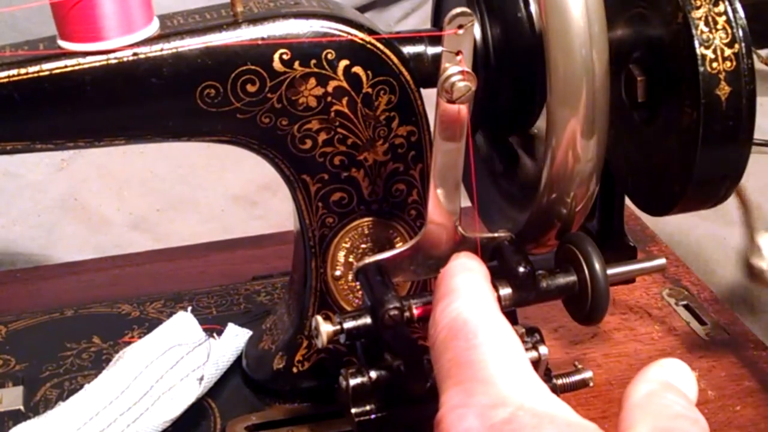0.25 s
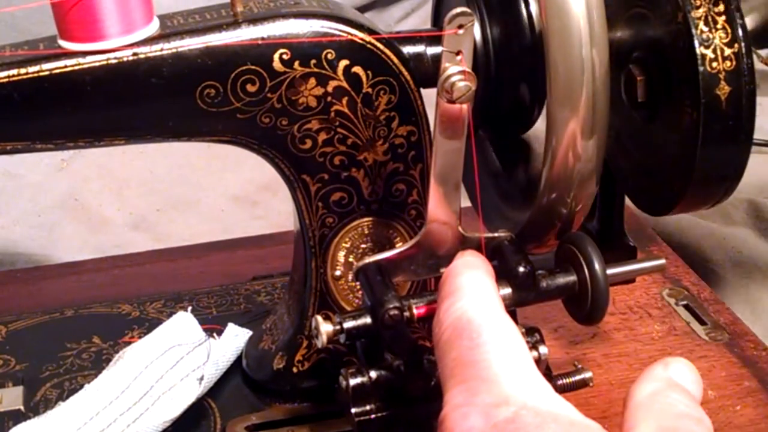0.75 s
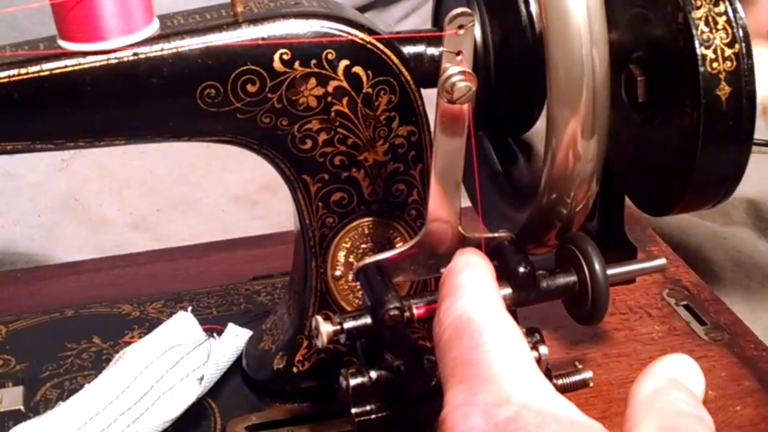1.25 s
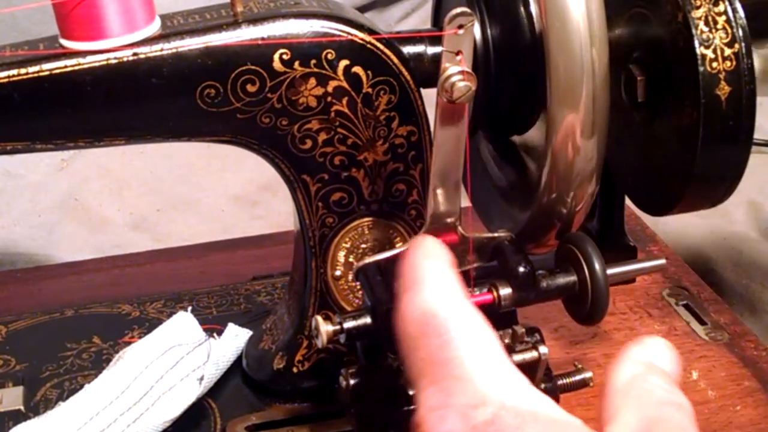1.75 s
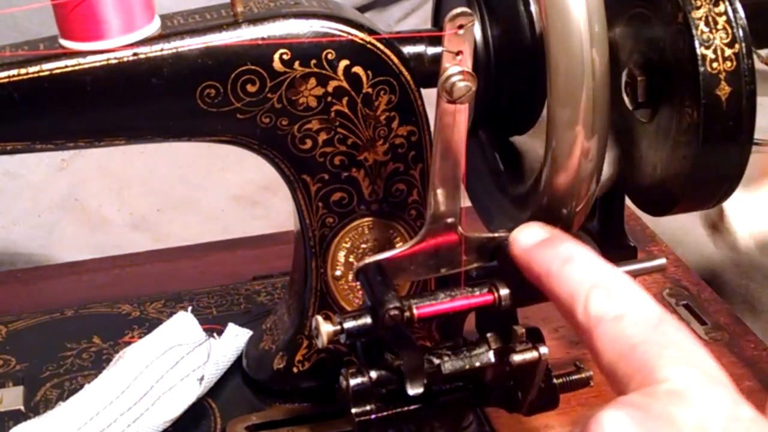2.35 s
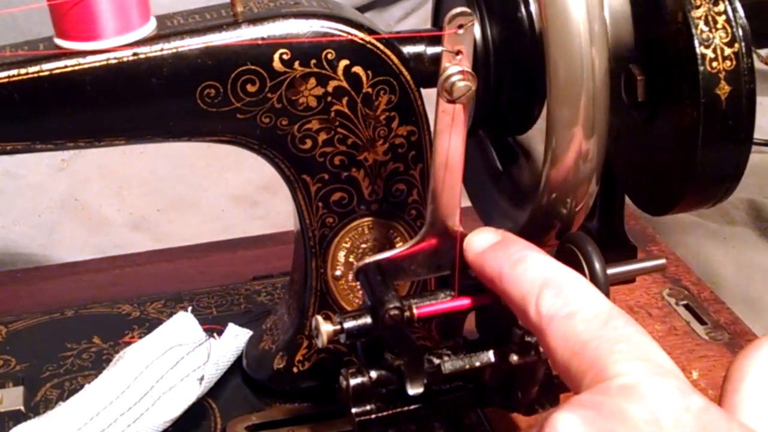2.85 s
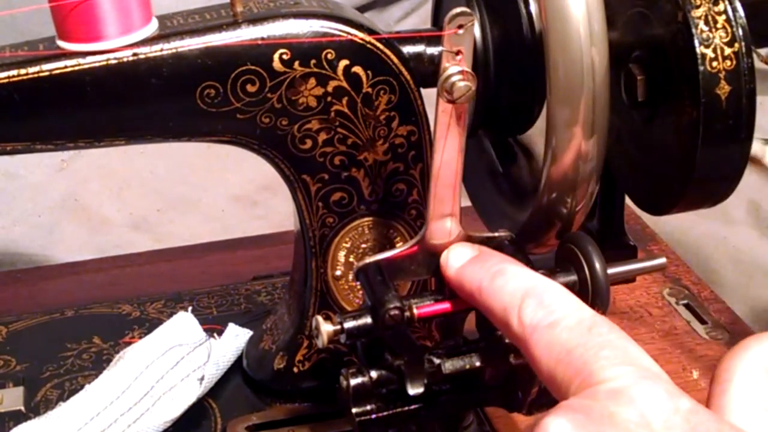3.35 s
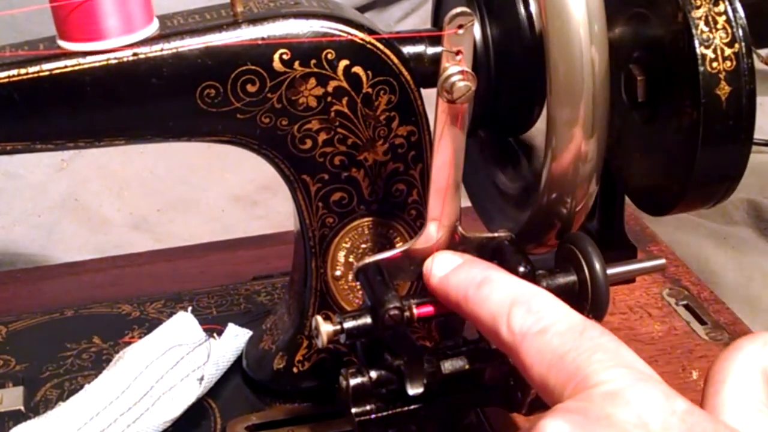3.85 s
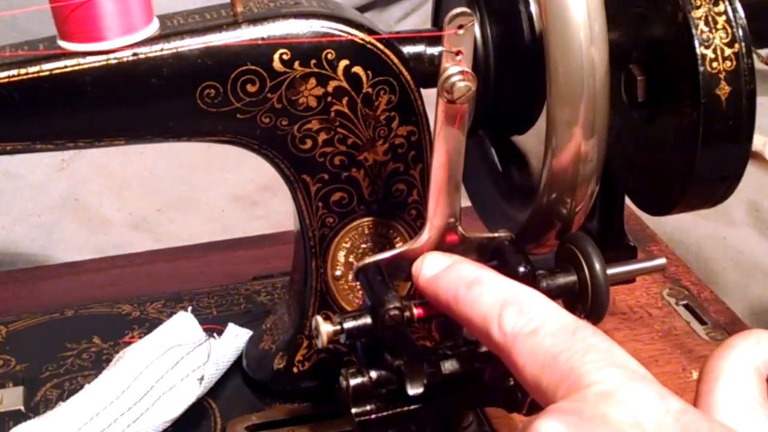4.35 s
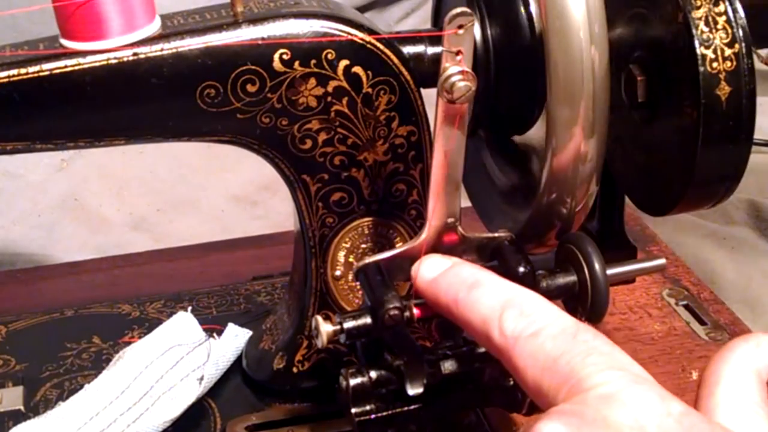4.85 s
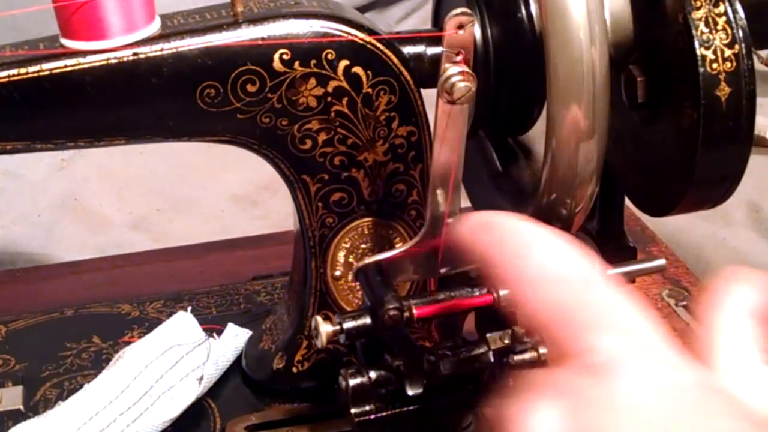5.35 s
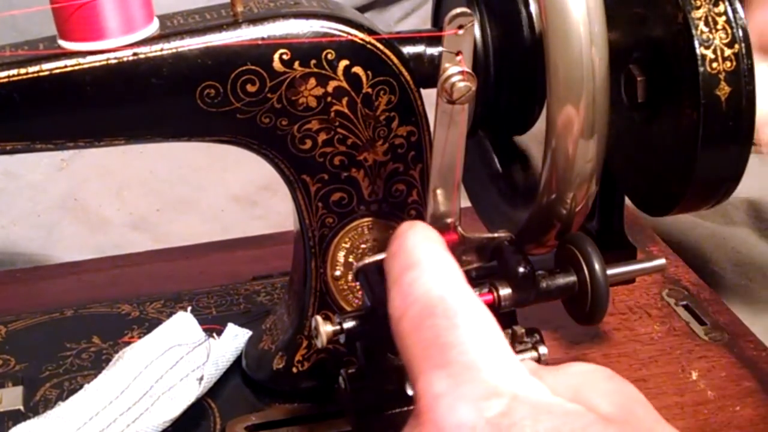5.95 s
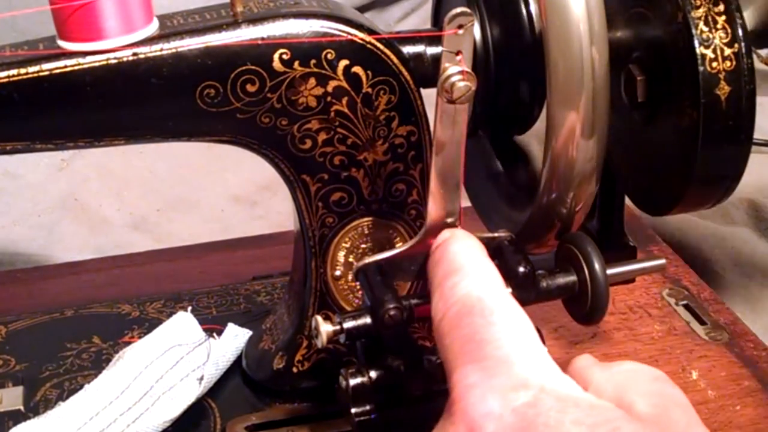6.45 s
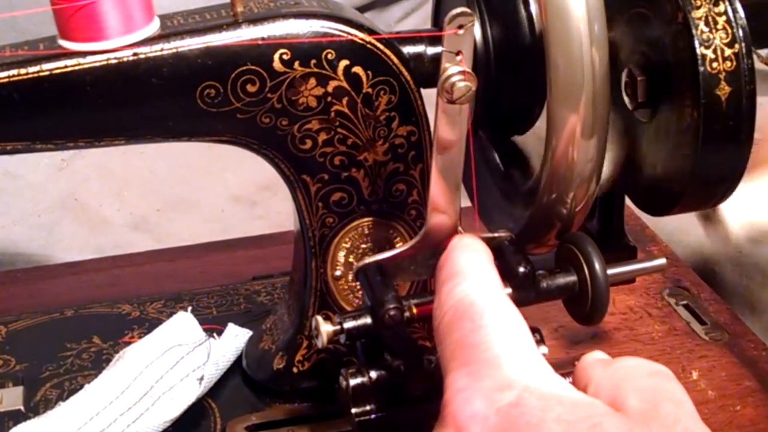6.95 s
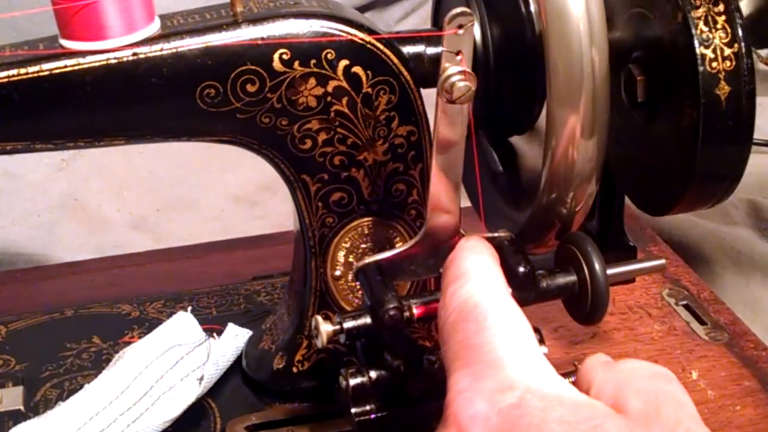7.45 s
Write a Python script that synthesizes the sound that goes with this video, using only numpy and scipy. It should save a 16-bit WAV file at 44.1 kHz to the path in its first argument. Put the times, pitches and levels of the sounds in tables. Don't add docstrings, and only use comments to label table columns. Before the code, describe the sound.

Close, continuous mechanical rattle and whirr of a hand-turned bobbin winder, with dull clacks, bright ticks and thin steel pings in a quiet room.

```python
import sys
import numpy as np
from scipy import signal
from scipy.fft import rfft, irfft
from scipy.io import wavfile
from scipy.ndimage import uniform_filter1d

SR = 44100
rng = np.random.default_rng(int(sys.argv[2]) if len(sys.argv) > 2 else 0)


def field_ratio(decibels):
    return 10 ** (np.asarray(decibels, dtype=float) / 20)


def wav_out(sig):
    wavfile.write(sys.argv[1], SR, np.round(np.clip(np.atleast_2d(sig).T, -1, 1) * 32767).astype(np.int16))


N = 339570
HZ = np.fft.rfftfreq(N, 1 / SR)

# time_s, effort_db, drag_db
CRANK = [(0.0, -49.5, 0.5), (0.5, -51, 3.5), (0.62, -56, -3.5), (0.95, -54.5, 0), (1.28, -53.5, -1),
         (1.65, -50.5, 2), (2.0, -50.5, -2), (2.49, -51, 1.5), (2.85, -50, 3), (3.3, -48, 0),
         (3.9, -51, -0.5), (4.5, -50, 2), (4.8, -51.5, -5.5), (5.42, -50, 1), (5.78, -51.5, -2.5),
         (6.2, -48, 0), (6.9, -48, -2.5), (7.5, -51.5, 1)]
# pitch_hz, width_hz, level_db
BASE_MODES = [(307.8, 28, -7.5), (364.3, 28.6, -7.5), (443.6, 24, -8.5)]
# pitch_hz, width_hz, level_db
ARM_MODES = [(537, 25, -7), (606.2, 22, -.5), (634.7, 34, -4.5), (678.6, 41, -6), (755.6, 31, -8.5)]
# pitch_hz, width_hz, level_db
WINDER_MODES = [(856, 110, -17), (1031.6, 96, -12.5), (1144, 47, -10), (1308, 120, -17.5),
                (1604, 230, -21.5), (1818, 360, -21.5), (2197, 200, -19.5), (2339, 110, -20)]
# middle_s, half_length_s, level_db
SURGES = [(3.16, 0.18, 4), (4.32, 0.067, 7), (5.63, 0.18, 4.5), (7.8, 0.065, 1.5), (1.8, .1, 4),
          (6.85, 0.027, 0.5), (0.59, 0.064, 2)]
# middle_s, half_length_s, level_db
DRAGS = [(.02, .03, 7), (.35, .03, 4), (.8, 0.05, 3.5), (2.86, 0.013, 5), (3.27, .03, 4.5), (3.5, 0.045, 3),
         (3.68, 0.035, 2.5), (3.96, 0.074, 2), (4.4, .06, 1), (6.14, 0.052, 4.5), (6.19, .035, 3.5),
         (6.49, .04, 0.5), (6.38, .06, -2), (1.33, .03, 1.5), (7.0, .1, 0)]
# start_s, level_db, length_s
KNOCKS = [(0.061, -43, 0.013), (0.202, -47.5, 0.0095), (0.239, -40.5, 0.0072), (0.383, -43.5, 0.02),
          (0.438, -44, 0.012), (0.518, -45, 0.0054), (0.573, -43.5, 0.0084), (0.63, -38, 0.013),
          (0.731, -42.5, 0.02), (1.007, -45, 0.015), (1.096, -44.5, 0.012), (1.313, -46.5, 0.0096),
          (1.508, -43, 0.011), (1.578, -42.5, 0.012), (1.635, -39.5, 0.011), (1.775, -40, 0.013),
          (1.818, -45.5, 0.0074), (1.85, -40, 0.0073), (1.993, -47, 0.013), (2.063, -44, 0.014),
          (2.247, -47, 0.009), (2.291, -42.5, 0.009), (2.442, -41.5, 0.018), (2.489, -46, 0.0088),
          (2.632, -52.5, 0.0091), (2.706, -41, 0.011), (2.743, -47, 0.013), (2.83, -34.5, 0.016),
          (2.945, -48, 0.01), (3.003, -44, 0.012), (3.034, -41, 0.012), (3.071, -38, 0.017),
          (3.294, -37, 0.013), (3.342, -39.5, 0.0098), (3.394, -38.5, 0.014), (3.521, -45, 0.013),
          (3.774, -46, 0.0096), (3.825, -47.5, 0.0065), (3.946, -44.5, 0.011), (4.084, -41.5, 0.011),
          (4.39, -46, 0.013), (4.598, -44, 0.011), (4.635, -45.5, 0.0095), (4.846, -53, 0.015),
          (5.141, -48, 0.015), (5.319, -48.5, 0.013), (5.391, -42, 0.012), (5.457, -46, 0.011),
          (5.551, -42.5, 0.0092), (5.816, -47, 0.0072), (6.028, -44, 0.011), (6.268, -36.5, 0.011),
          (6.463, -39, 0.011), (6.524, -37.5, 0.012), (6.597, -43.5, 0.013), (6.661, -42, 0.011),
          (7.399, -42, 0.013), (7.485, -43.5, 0.0072), (7.526, -48, 0.014), (7.68, -52, 0.011)]
# start_s, level_db, length_s
RAPS = [(0.2394, -48, 0.004), (0.4663, -40, 0.006), (0.5077, -42, 0.0035), (0.5995, -49, 0.0041),
        (1.0894, -43, 0.0046), (1.1862, -46.5, 0.0047), (1.28, -47, 0.0046), (1.3683, -44.5, 0.0068),
        (1.4192, -44, 0.0065), (1.4501, -42.5, 0.005), (1.5199, -43, 0.0065), (1.723, -42.5, 0.0034),
        (2.0023, -46, 0.0042), (2.0597, -42, 0.0043), (2.377, -70, 0.0045), (2.4314, -47, 0.0044),
        (2.58, -45, 0.0045), (2.6524, -39, 0.0063), (2.7013, -43.5, 0.005), (2.7412, -41, 0.0042),
        (2.824, -39.5, 0.0027), (2.8988, -46, 0.0038), (2.9462, -49, 0.0034), (2.9971, -39, 0.0035),
        (3.0395, -50, 0.005), (3.0769, -48, 0.0071), (3.1662, -36.5, 0.0053), (3.2206, -41, 0.0059),
        (3.7269, -51, 0.0055), (3.9335, -49, 0.005), (4.0158, -40.5, 0.005), (4.0756, -41, 0.006),
        (4.1774, -45, 0.0062), (4.2393, -50.5, 0.005), (4.5925, -39.5, 0.005), (4.8194, -42.5, 0.005),
        (4.8933, -45, 0.005), (4.9691, -48, 0.005), (5.1198, -55, 0.0061), (5.2574, -39, 0.007),
        (5.3233, -42, 0.0039), (5.3882, -42.5, 0.0042), (5.455, -50, 0.0046), (5.5238, -42.5, 0.0043),
        (5.5967, -41, 0.005), (5.9604, -44.5, 0.005), (6.0646, -39.5, 0.0056), (6.1928, -45, 0.005),
        (6.2652, -43.5, 0.005), (6.346, -45, 0.0059), (6.4388, -37.5, 0.0061), (6.6014, -37.5, 0.0066),
        (6.6593, -44, 0.005), (6.6957, -50, 0.005), (6.8319, -57, 0.004), (7.2494, -46.5, 0.0033),
        (7.3183, -52, 0.0045), (7.4664, -40, 0.0045), (7.5428, -41.5, 0.0061), (7.6201, -47, 0.0042)]
# start_s, level_db, length_s
THUDS = [(0.018, -44, 0.007), (0.207, -49, 0.016), (0.316, -50.5, 0.014), (0.727, -50, 0.016),
         (1.062, -46, 0.012), (1.169, -55.5, 0.012), (1.445, -47, 0.012), (1.502, -48, 0.016),
         (1.786, -55, 0.0084), (2.245, -44.5, 0.016), (2.765, -50, 0.018), (2.875, -52, 0.016),
         (2.983, -45.5, 0.021), (3.093, -41, 0.016), (3.262, -54, 0.014), (3.343, -39, 0.014),
         (3.631, -42.5, 0.019), (4.212, -44.5, 0.021), (4.293, -43, 0.016), (4.507, -42, 0.014),
         (4.659, -45, 0.024), (5.04, -56, 0.016), (5.106, -52, 0.012), (5.221, -46, 0.016),
         (5.292, -46, 0.011), (5.6, -58, 0.018), (5.662, -50, 0.012), (5.845, -52, 0.014),
         (5.993, -47, 0.013), (6.154, -42, 0.022), (6.242, -51, 0.014), (6.419, -39.5, 0.014),
         (6.54, -47, 0.014), (6.66, -56, 0.013), (6.803, -52, 0.019), (6.858, -44, 0.0082),
         (6.9, -46.5, 0.014), (7.432, -58, 0.012), (7.506, -53, 0.015), (7.66, -46, 0.011)]
# pitch_hz, level_db
RUB_COLOUR = [(1500, 1.5), (2300, -4), (2950, 1.5), (3400, -4), (4800, -4.5), (5150, -0.5), (5800, -4),
              (6800, -2.5), (7600, -9), (8300, -3), (9200, -10), (12800, -14.5), (16000, -20)]
# pitch_hz, level_db, t60_s
STEEL_MODES = [
    (3541, -1, .12),
    (4490, -12, .09),
    (5120, -1, .02),
    (7865, -14, .06),
]
# start_s, gap_s, first_db, second_db
TURNS = [(.3162, 0.09, -59, -64), (.7163, 0.11, -61, -67), (1.172, 0.12, -60, -61),
         (1.5454, 0.076, -59, -59.5), (1.8502, 0.077, -60.5, -56), (2.175, 0.074, -60.5, -68),
         (2.4957, 0.075, -56, -59), (2.7821, 0.074, -58.5, -56), (3.0599, 0.065, -58.5, -57),
         (3.3283, 0.076, -61.5, -60), (3.6252, 0.092, -63.5, -62), (3.9754, 0.082, -60, -61),
         (4.3056, .077, -59, -57), (4.6204, 0.079, -60.5, -63), (4.9611, 0.074, -61.5, -79),
         (5.2789, .069, -58, -61), (5.5792, 0.081, -59, -58), (5.8476, 0.066, -66, -59),
         (6.2113, 0.068, -58, -57), (6.4827, 0.066, -55, -56.5), (6.7735, 0.088, -57.5, -65),
         (7.0818, 0.071, -64, -58), (7.3996, 0.083, -54.5, -57.5)]
# start_s, level_db
JOLTS = [(2.0123, -63.5), (2.6309, -64), (2.9223, -64.5), (3.5369, -62.5), (4.2193, -64), (4.4982, -67.5),
         (6.1639, -63), (6.4288, -62), (7.2759, -69)]
# start_s, level_db, pitch_hz, t60_s, ring_db
TICKS = [(.646, -52.5, 4280, 0.021, -6), (1.524, -50.5, 4400, 0.012, -3), (1.642, -45.5, 6900, 0.024, -3.5),
         (2.630, -43, 4420, 0.042, -6), (3.537, -32.5, 6900, 0.016, -10), (3.537, -44, 10400, 0.018, 11.5),
         (4.094, -41, 7250, 0.02, -25), (4.219, -35, 4820, 0.021, -15), (4.512, -38, 5220, 0.016, 4),
         (5.423, -59, 3020, 0.016, 3), (5.506, -46, 3500, 0.022, -26), (5.852, -45, 4500, 0.016, -13),
         (6.429, -41.5, 5100, 0.053, -14), (6.444, -46, 6500, 0.067, -5), (2.999, -50, 4530, 0.011, -17),
         (3.155, -46, 7760, 0.11, -5), (6.947, -47, 4530, 0.026, -13), (7.309, -35.5, 5060, 0.028, 4),
         (7.309, -40, 7760, 0.0044, -17), (7.307, -38, 10800, 0.012, -12), (7.638, -45, 9000, .01, 0.5)]
# start_s, level_db
PAWL = [
    (7.337, -48),
    (7.409, -41),
    (7.485, -40),
    (7.562, -42),
    (7.638, -42),
]
# start_s, level_db
CLACKS = [(0.198, -50), (0.386, -42.5), (0.463, -43.5), (1.523, -37), (1.981, -53), (2.6313, -39),
          (2.7011, -41), (2.83, -65), (2.999, -35.5), (3.075, -47), (3.1647, -51), (3.24, -48),
          (3.4026, -42), (3.472, -44), (3.54, -40.5), (3.7253, -44.5), (4.5114, -48), (5.177, -42.5),
          (5.289, -44), (5.423, -39), (6.0928, -44), (6.269, -41.5), (6.347, -45), (6.4693, -41),
          (6.564, -44), (6.659, -46), (6.768, -43), (6.191, -47), (7.067, -42), (7.308, -41), (7.18, -39.5),
          (7.697, -43)]
# start_s, level_db
TAPS = [(0.389, -51), (0.468, -61.5), (2.012, -45.5), (3.166, -43.5), (3.724, -43.5), (4.101, -58),
        (4.427, -41), (5.849, -49), (7.62, -49)]
# pitch_hz, level_db (per Hz)
FLOOR = [(15, -82.5), (40, -82), (100, -84.5), (170, -84.5), (280, -91), (600, -96), (1500, -103),
         (3000, -102), (8000, -103), (11500, -103.5), (12800, -101.5), (13300, -102.5), (14500, -101),
         (16000, -101)]
# pitch_hz, level_db
MAINS = [
    (120.7, -66.5),
    (58.8, -70.5),
]
# time_s, pitch_hz, level_db
PASSING = [(0, 96.9, -57.5), (.33, 95.8, -55.5), (.85, 94.7, -60), (1.15, 90.4, -64), (1.5, 85.4, -70),
           (2.0, 80.2, -70), (2.55, 77.5, -64), (2.75, 77.6, -83)]
# middle_s, half_length_s, pitch_hz, glide_hz_per_s, level_db
FAR_ENGINES = [(1.2, 0.37, 126.3, -5.5, -64.5), (3.202, 0.41, 66.4, 0, -66), (3.597, 0.45, 87, -4, -68),
               (4.65, 0.38, 78.9, -3, -63), (5.4, 0.27, 77.7, -12, -72), (5.302, .15, 61.7, 4.5, -66),
               (5.0, .3, 140, -3, -76), (6.15, 0.19, 137.6, 7, -73), (6.402, 0.24, 66.5, 6, -66),
               (6.802, 0.38, 75.6, -2.5, -63.5), (7.348, .3, 138.7, -2, -64)]
# pitch_hz, right_first_share, left_first_share (of power)
PATHS = [(31.4, 1, 0.046), (73, 0.44, 0.14), (195, 0.29, 0.023), (327, 0.074, 0.99), (645, 0.024, 0.97),
         (854, 0.14, 0.73), (1330, 0.95, 0.41), (2510, 0.51, 0.46), (3610, 0.28, 0.7), (4860, 0.33, 0.54),
         (6500, 0.1, 0.55), (8030, 0.32, 0.32), (8800, 0.19, 0.6), (11600, 0.37, 0.076), (13100, 0.37, 0),
         (16500, 0.45, 0)]
# pitch_hz, left_minus_right_db
LEAN = [(60, 2), (330, 1), (480, 7), (610, 5), (800, 1), (1200, 2), (1700, -8.5), (2200, 5), (2550, -3),
        (2950, 2), (3400, -5.5), (5800, 1.5), (7000, 1.5), (15000, 2.5)]


def gears():
    parts = (
        (BASE_MODES, .95, .25, 50, field_ratio(lean_db())),
        (ARM_MODES, .85, .35, 40, field_ratio(swells(DRAGS))),
        (WINDER_MODES, .62, .8, 32, field_ratio(effort(0.19))),
    )
    whirr = 0
    for part, steady, lumpy, per_s, load in parts:
        contacts = lumpy * lumps(per_s, 2.4, 0.0085) + .35 * lumps(160, 2.2, .0025)
        force = load * (steady + contacts)
        whirr = whirr + coloured(force * rng.standard_normal((4, N)), ringing(part))

    arm_and_base = ringing(ARM_MODES, flip=0.67) + 0.17 * ringing(BASE_MODES, flip=0.91)
    knocks = coloured(blows(KNOCKS, gain_db=38.0, rise=9, stretch=1.25, clean=.55), arm_and_base)
    spindle = ringing(WINDER_MODES[:5], flip=0.7)
    raps = coloured(blows(RAPS, gain_db=40, rise=6, stretch=1.7, clean=0.44), spindle)
    base = ringing(BASE_MODES, flip=.8)
    thuds = coloured(blows(THUDS, gain_db=40.5, rise=7.5, stretch=1.1, clean=0.32), base)
    return evened(whirr) * field_ratio(curve(CRANK) - 1.3) + knocks + raps + thuds


def rubbing():
    grit = 0.71 + 0.34 * lumps(90, 3.5, 0.0067)
    hiss = evened(coloured(grit * rng.standard_normal((4, N)), field_ratio(read(RUB_COLOUR))))
    snaps = lumps(30, 4.1, 0.008) * rng.standard_normal((4, N))
    crackle = evened(coloured(snaps, mode(12200, 1600) ** 2))
    return hiss * field_ratio(rub_db() + 3.5) + field_ratio(-77.5) * crackle


def steel():
    out = np.zeros((4, N))
    t = np.arange(5000) / SR
    # start, level, and how much the upper modes speak in dB
    strikes = [(s + k * gap, db, 2) for s, gap, *pair in TURNS for k, db in enumerate(pair)]
    strikes += [(s, db, 10) for s, db in JOLTS]
    for s, db, upper_db in strikes:
        phase = rng.random((len(STEEL_MODES), 3, 1))[:, [0, 0, 1, 2]]
        upper_db = upper_db + 1.5 * rng.standard_normal()
        for k, (hz, mode_db, t60) in enumerate(STEEL_MODES):
            fade = field_ratio(db + 2.0 + mode_db + upper_db * (k > 0) - 60 * t / t60)
            ring = fade * np.minimum(t / 0.00034, 1)
            add(out, s, ring * np.sin(2 * np.pi * (hz * t + phase[k])))
    singing = mode(3541, 22) + .8 * mode(4490, 25) + .55 * mode(7865, 45)
    shaken = coloured(lumps(25, 3.2, 0.0072) * rng.standard_normal((4, N)), singing)
    return out + evened(shaken) * field_ratio(rub_db() - 20.5)


def small_parts():
    out = np.zeros((4, N))
    for s, db, hz, t60, ring_db in TICKS:
        tick = snap(db + 0.26, hz, t60, sharp=1.7)
        ring = snap(db + ring_db - 10.0, 4500, t60=0.013, sharp=11)
        add(out, s, tick + ring)
    for s, db in PAWL:
        add(out, s, snap(db, 6750, t60=0.0074, sharp=3.5))
    for s, db in CLACKS:
        add(out, s, snap(db + 3.0, 1600, t60=0.0041, sharp=0.87))
    for s, db in TAPS:
        add(out, s, snap(db - 2.5, 3100, t60=0.05, sharp=2.6))
    return out


def room():
    t = np.arange(N) / SR
    out = coloured(rng.standard_normal((4, N)), field_ratio(read(FLOOR)) * np.sqrt(SR / 2))
    waver = evened(coloured(rng.standard_normal((2, N)), 1 / (1 + (HZ / 0.86) ** 4)))
    tones = [(hz * t, field_ratio(db + 0.87 * w)) for (hz, db), w in zip(MAINS, waver)]
    tones += [(np.cumsum(curve(PASSING)) / SR, field_ratio(curve(PASSING, column=2)))]
    for s, half, hz, glide, db in FAR_ENGINES:
        turns = hz * t + glide / 2 * (t - s) ** 2
        tones += [(turns, field_ratio(db) * np.exp(-((t - s) / half) ** 2))]
    hum = sum(level * np.exp(2j * np.pi * turns) for turns, level in tones)
    port_phase = np.exp(2j * np.pi * np.array([[0], [0.11]]))
    out[2:] += np.sqrt(2) * (hum * port_phase).real
    return out


def ports(paths):
    right_lead, left_lead = (.388, -.453), (.328, .735)  # (ms, turns of phase)
    right_first = np.clip(read(PATHS), 0, 1)
    left_first = np.clip(read(PATHS, column=2), 0, 1)
    own = np.sqrt(np.clip(1 - right_first - left_first, 0, 1))
    a, b, left_own, right_own = rfft(paths)
    a, b = a * np.sqrt(right_first), b * np.sqrt(left_first)
    lead, lag = (np.exp(2j * np.pi * (HZ * ms / 1000 + turns)) for ms, turns in (right_lead, left_lead))
    lean = field_ratio(read(LEAN) / 2)
    left = (a + b + own * left_own) * lean
    right = (a * lead + b / lag + own * right_own) / lean
    return irfft(np.array([left, right]), N)


def effort(slope):
    return slope * (curve(CRANK) + 50)


def rub_db():
    return -61.5 + effort(.9) + curve(CRANK, column=2)


def lean_db():
    return -1.5 + effort(0.3) + swells(SURGES)


def swells(rows):
    t = np.arange(N) / SR
    return sum(db * np.exp(-((t - s) / half) ** 2) for s, half, db in rows)


def lumps(per_s, spread_db, length_s):
    strength = field_ratio(spread_db * np.minimum(rng.exponential(1, N), 4))
    contacts = strength * (rng.random(N) < per_s / SR)
    t = np.arange(3000) / (length_s * SR)
    return evened(signal.oaconvolve(contacts, np.exp(-t) * (1 - np.exp(-6 * t)))[:N])


def blows(events, gain_db, rise, stretch, clean):
    out = np.zeros((4, N))
    for s, db, length_s in events:
        t = np.arange(2500) / (stretch * length_s * SR)
        push = rng.standard_normal((4, 2500)) * np.exp(-t) * (1 - np.exp(-rise * t))
        push = push / np.linalg.norm(push, axis=1, keepdims=True)
        push = push + clean * (np.arange(2500) == 8)
        push = uniform_filter1d(push, size=11)
        add(out, s, field_ratio(db + gain_db) * push / np.linalg.norm(push, axis=1, keepdims=True))
    return out


def snap(db, hz, t60, sharp):
    t, at = np.arange(2048) / SR, np.fft.rfftfreq(2048, 1 / SR)
    noise = rng.standard_normal((4, 2048)) * field_ratio(-60 * t / t60) * np.minimum(t / .0012, 1)
    burst = irfft(rfft(noise) * mode(hz, hz / sharp, at) ** 2)
    return field_ratio(db) * burst / abs(burst).max(-1, keepdims=True)


def mode(hz, width, at=HZ):
    return 1j * at * width / (hz ** 2 - at ** 2 + 1j * at * width)


def ringing(modes, flip=-1):
    return sum(flip ** k * field_ratio(db) * mode(hz, width) for k, (hz, width, db) in enumerate(modes))


def coloured(x, gain):
    return irfft(rfft(x) * gain, N)


def evened(x):
    return x / np.sqrt(np.mean(x ** 2) + 1e-20)


def read(points, column=1):
    points = np.array(points)
    return np.interp(np.log(HZ + 1), np.log(points[:, 0] + 1), points[:, column])


def curve(rows, column=1):
    rows = np.array(rows)
    return np.interp(np.arange(N) / SR, rows[:, 0], rows[:, column])


def add(mix, s, sound):
    part = mix[..., round(s * SR):][..., :sound.shape[-1]]
    part += sound[..., :part.shape[-1]]


def scene():
    return ports(gears() + rubbing() + steel() + small_parts() + room())


def low_pass(x):
    return signal.sosfilt(signal.butter(12, 16110, fs=SR, output="sos"), x)


def record(dry):
    mix = coloured(dry, HZ < 15620)
    return low_pass(mix)


dry = scene()
out = record(dry)
wav_out(out)
```